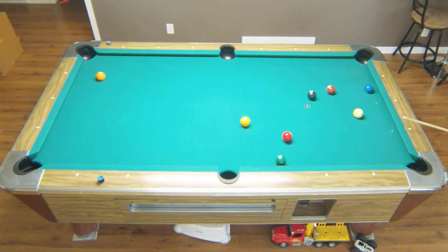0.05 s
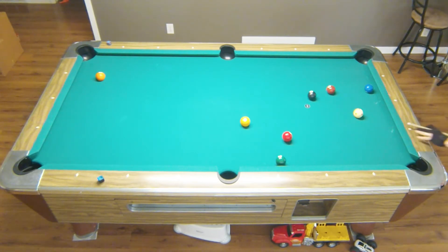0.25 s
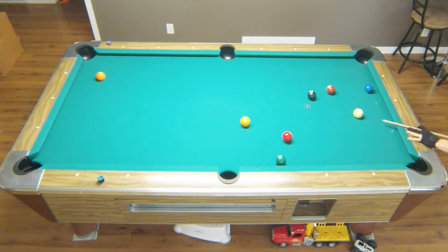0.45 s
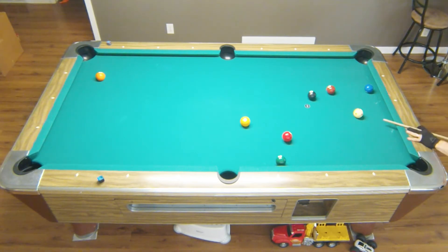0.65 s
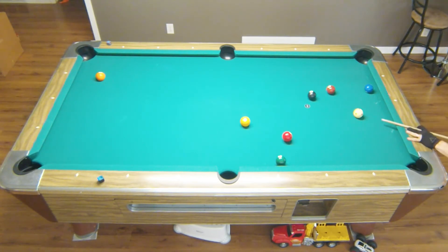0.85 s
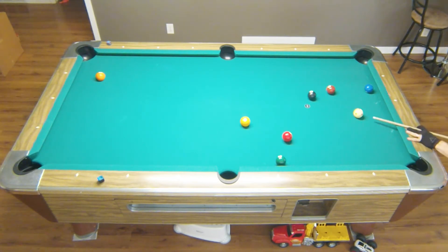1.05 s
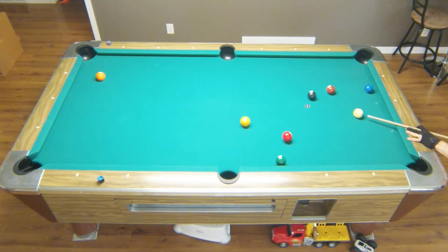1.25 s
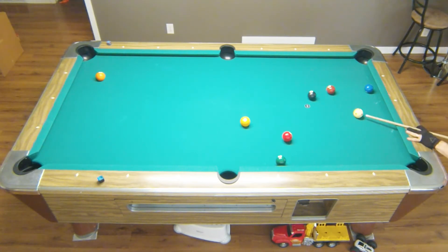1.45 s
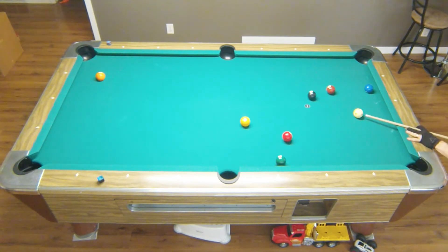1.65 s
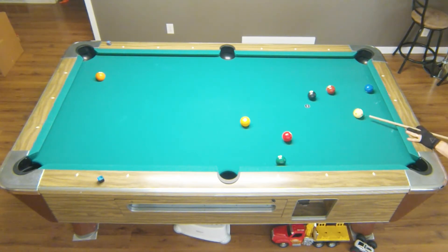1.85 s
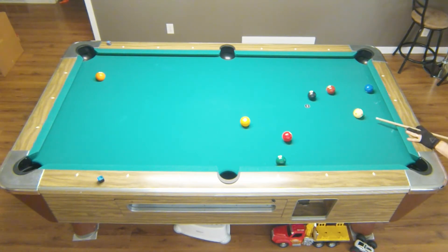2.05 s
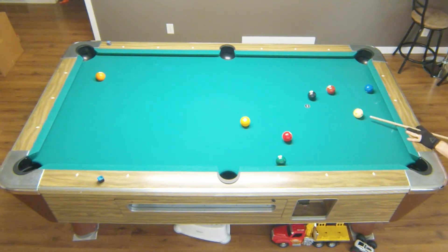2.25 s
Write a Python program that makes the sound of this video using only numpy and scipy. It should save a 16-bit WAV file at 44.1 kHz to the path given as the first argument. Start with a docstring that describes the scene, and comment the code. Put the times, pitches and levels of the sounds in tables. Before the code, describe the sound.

A pool ball rolls with a brief low rumble, then drops through the inside of the table in a quick tumble of dull thuds with faint clicks. The wooden cabinet booms in a bare, quietly humming room.

```python
"""A pool ball drops through the inside of a pool table in a quick tumble of dull thuds.
Every blow pushes a panel, rings the wooden cabinet and booms in a bare room; faint clicks and
scraping are heard. A low rumble of rolling comes first, a soft hollow tone flares up at the
start and again near the end, and the room hums quietly throughout."""
import sys
import numpy as np
from scipy import signal
from scipy.fft import rfft, irfft, next_fast_len
from scipy.io import wavfile
from scipy.ndimage import map_coordinates

SR = 44100
rng = np.random.default_rng(int(sys.argv[2]) if len(sys.argv) > 2 else 0)


def unload_wav(signal):
    """Save mono or channel-first audio to the path in sys.argv[1] as 16-bit WAV at rate SR, clipped to [-1, 1]."""
    wavfile.write(
        sys.argv[1],
        SR,
        np.round(np.clip(np.atleast_2d(signal).T, -1, 1) * 32767).astype(np.int16),
    )


N = 105840

# Blows on the cabinet. Each row: start in seconds, gain in dB, treble corner in Hz (higher is harder),
# bass corner in Hz (lower is heavier), first push in dB over that gain.
BLOWS = [(.202, -43, 176.3, 37.8, 13.5), (.231, -37, 131, 91, 10.5), (0.2515, -42.5, 203, 152, 9),
         (.366, -40, 510, 49.4, 3.5), (.383, -44, 517, 40, 9), (.431, -46.5, 418, 141, 18),
         (0.4846, -42, 480, 94, 10), (0.4936, -35, 758, 50, 10), (.529, -46, 1120, 197, 6),
         (.567, -47.5, 384, 35.6, 2), (0.649, -52.5, 400, 222, 11), (0.784, -57.5, 595, 35, 14)]
# The wood's ring. Each row: pitch in Hz, relative level in dB, t60 in seconds.
CABINET_MODES = [(67, -3.5, .52), (113, -7, .65), (145, -7, .68), (202, -3, .64), (253, -5, .62),
                 (307, -9, .65), (340, -12, .3), (432, -11, .6), (474, -10, .65), (538, -6, .55),
                 (595, -10, .55), (706, -10, .52), (743, -11, .55), (810, -13, .6), (879, -14, .58),
                 (1003, -17, .6), (1174, -20, .6), (1286, -25, .6), (1807, -28, .6)]
# Hard contacts of the ball. Each row: start in seconds, click gain in dB, reverb gain in dB.
HARD_CONTACTS = [(0.1961, -63.5, -71.5), (.362, -81, -65), (.483, -69, -67.5)]
# The rumble's fade. Each row: time in seconds, level in dB.
ROLL_FADE = [(0, -50), (.035, -48.5), (.07, -52), (.11, -52), (.19, -55.5), (.3, -68), (.5, -110)]
# Faint scraping. Each row: start in seconds, end in seconds, level in dB.
SCRAPE_SPANS = [(0.134, 0.53, -78.5), (0.283, 0.417, -80.5), (.75, 1.445, -89)]
# Flares of the hollow tone. Each row: start in seconds, gain in dB, t60 in seconds.
FLARES = [(0, -48.5, 0.22), (1.872, -59.5, 0.38)]
# How long the room rings. Each row: frequency in Hz, t60 in seconds.
ROOM_DECAY = [(60, 0.99), (200, 1), (500, 0.75), (1000, 1), (3000, 0.89), (6000, 0.97), (12000, 0.78)]
# The room's hum. Each row: pitch in Hz, level in dB before the trim.
HUM_PARTIALS = [(118.4, -73), (242.2, -77.5), (382.2, -79), (511.4, -80), (629.8, -86.5)]

# Noise colours. Each row: frequency in Hz, relative spectral density in dB.
BOOM_COLOUR = [(25, -37), (45, -12.5), (62, -2), (130, -8.5), (230, -6), (350, -1), (520, -4.5),
               (900, -8.5), (1400, -21), (2200, -27.5), (5000, -35)]  # the room's answer to a thud
TICK_COLOUR = [(1000, -28), (2700, -15), (3300, 1), (3900, 3), (4500, -7), (5500, -4), (7500, -32),
               (13000, -34)]  # the dry click
CLICK_REVERB_COLOUR = [(500, -31), (1500, 1.5), (2700, -3), (3700, -2.5), (5500, -6.5), (7700, -11),
                       (9000, -21), (13000, -22)]  # the room's answer to a click
ROLL_COLOUR = [(15, -27), (26, -1.5), (35, 0.5), (52, -10), (80, -6), (130, -21.5), (230, -18.5),
               (320, -28), (600, -34), (1500, -50.5), (4000, -87)]  # deep rumble
SCRAPE_COLOUR = [(800, -9), (2000, -4.5), (4000, 6.5), (7000, -2), (9500, -6.5), (13000, -7)]  # thin scraping hiss
AIR_COLOUR = [(15, -45), (25, -14), (59, -0.5), (87, -6), (119, -5.5), (211, -9), (240, 0.5), (288, -12.5),
              (320, -6.5), (346, -14), (374, -10), (437, -13.5), (497, -15.5), (645, -17.5), (774, -20.5),
              (836, -18.5), (1140, -23), (2020, -34), (12500, -45), (16200, -71), (22000, -120)]  # dark bed of room noise

TAIL_S, TOP_HZ = .9, 12900  # length of each one-shot; high cut on the mix


def thuds():
    """Each blow pushes a panel, rings the cabinet and fills the room with a boom."""
    push_hz, push_decay_s = 220, .0038
    ring_attack_s, scatter_db = .0042, 2
    punch_db, punch_decay_s = 5, .0099  # extra swing of every mode just after the blow
    boom_db, boom_attack_s = 2.5, .0054
    out, t = np.zeros(N), tail_time()
    push = np.sin(2 * np.pi * push_hz * t) * np.exp(-t / push_decay_s)
    swing = (1 - np.exp(-t / ring_attack_s)) * (1 + amp(punch_db) * np.exp(-t / punch_decay_s))
    modes = np.array([(-1) ** k * amp(db) * ringing(hz, t60, t)
                      for k, (hz, db, t60) in enumerate(CABINET_MODES)])
    for start, db, treble_hz, bass_hz, push_db in BLOWS:
        mode_gains = amp(scatter_db * rng.standard_normal(len(modes)))
        ring = swing * (mode_gains @ modes)
        boom = amp(boom_db) * room_tail(BOOM_COLOUR) * (1 - np.exp(-t / boom_attack_s))
        blow = ring + boom - amp(push_db) * push
        add(out, start, amp(db) * filtered(blow, lambda hz: contact_tone(hz, treble_hz, bass_hz)))
    return out


def contact_tone(hz, treble_hz, bass_hz):
    """The EQ of one blow: soft contacts lose treble, light ones lose bass."""
    treble_order, bass_order = 1.93, 2.28
    treble_loss = 1 + (hz / treble_hz) ** (2 * treble_order)
    bass_loss = 1 + (bass_hz / (hz + 1)) ** (2 * bass_order)
    return minimum_phase((treble_loss * bass_loss) ** -.5)


def clicks():
    """Each hard contact gives a short bright tick, a thin ring and a wash of reverb."""
    tick_decay_s, ring_db = .005, -14.5
    out, t = np.zeros(N), tail_time()
    ring = amp(ring_db) * ringing(hz=3600, t60=.77, t=t)
    for start, click_db, reverb_db in HARD_CONTACTS:
        tick = noise(TICK_COLOUR, len(t)) * np.exp(-t / tick_decay_s)
        reverb = amp(reverb_db) * room_tail(CLICK_REVERB_COLOUR)
        add(out, start, amp(click_db) * (tick + ring) + reverb)
    return out


def rolling():
    """The rolling ball makes a low rumble that fades under the first thuds."""
    level_db = np.interp(np.arange(N) / SR, *np.transpose(ROLL_FADE))
    return amp(level_db) * noise(ROLL_COLOUR)


def scraping():
    """Faint stretches of scraping hiss, each faded in and out."""
    t, fade_s = np.arange(N) / SR, .03
    level = sum(amp(db) * np.clip(np.minimum(t - start, end - t) / fade_s + .5, 0, 1)
                for start, end, db in SCRAPE_SPANS)
    return level * noise(SCRAPE_COLOUR)


def hollow_tone():
    """A soft low tone that flares up quickly and dies away."""
    pitch_hz, attack_s = 231.3, .0042
    out, t = np.zeros(N), tail_time()
    for start, db, t60 in FLARES:
        add(out, start, amp(db) * ringing(pitch_hz, t60, t) * (1 - np.exp(-t / attack_s)))
    return out


def room_tail(colour):
    """Diffuse reverb in which each frequency dies at the room's speed."""
    size = len(tail_time())
    hz, t, bands = signal.stft(noise(colour, size), SR, nperseg=1024)
    fade = np.exp(-np.log(1000) * t / along(ROOM_DECAY, hz)[:, None])
    return signal.istft(bands * fade, SR, nperseg=1024)[1][:size]


def room_tone():
    """A bed of steady air noise under a hum whose phase wanders."""
    air_db, sway_db, hum_trim_db = -63.5, .37, -1
    t = np.arange(N) / SR
    hum = sum(amp(db + hum_trim_db) * np.sqrt(2) * np.sin(2 * np.pi * hz * t + wobble(rate=5.22))
              for hz, db in HUM_PARTIALS)
    air = amp(air_db + sway_db * wobble(rate=16)) * noise(AIR_COLOUR)
    return air + hum


def ringing(hz, t60, t):
    """One mode, dying by 60 dB in t60 seconds."""
    return np.sin(2 * np.pi * hz * t) * np.exp(-np.log(1000) * t / t60)


def tail_time():
    """Seconds since the start of a one-shot."""
    return np.arange(int(TAIL_S * SR)) / SR


def amp(db):
    """Decibels to gain."""
    return 10 ** (np.asarray(db) / 20)


def along(points, hz):
    """Read a curve of (Hz, value) points on a log frequency axis."""
    point_hz, values = np.transpose(points)
    return np.interp(np.log(hz + 1), np.log(point_hz + 1), values)


def wobble(rate):
    """A smooth random curve, rate knots a second."""
    knots = rng.standard_normal(int(N * rate / SR) + 4)
    return map_coordinates(knots, [np.arange(N) * rate / SR])


def filtered(x, gain):
    """EQ x with a gain that depends on frequency."""
    size = 2 * next_fast_len(len(x) // 2 + 2048)
    return irfft(rfft(x, size) * gain(np.fft.rfftfreq(size, 1 / SR)), size)[:len(x)]


def minimum_phase(gain):
    """A response with this gain and no pre-ring, so attacks stay clean."""
    cepstrum = irfft(np.log(np.maximum(gain, 1e-6)))
    half = len(cepstrum) // 2
    cepstrum[1:half] *= 2
    cepstrum[half + 1:] = 0
    return np.exp(rfft(cepstrum))


def noise(colour, size=N):
    """Coloured noise of rms 1."""
    x = filtered(rng.standard_normal(size), lambda hz: amp(along(colour, hz)))
    return x / np.sqrt(np.mean(x ** 2) + 1e-20)


def add(out, start, x):
    """Mix x into out from start seconds."""
    part = out[max(0, round(start * SR)):][:len(x)]
    part += x[:len(part)]


def scene():
    """All the layers in one mono mix."""
    return (thuds() + clicks() + rolling() + scraping() + hollow_tone() + room_tone())[None]


def record(dry):
    """A brick-wall high cut takes off everything above TOP_HZ."""
    return np.array([filtered(x, lambda hz: hz < TOP_HZ) for x in dry])


dry = scene()
out = record(dry)
unload_wav(out)
```